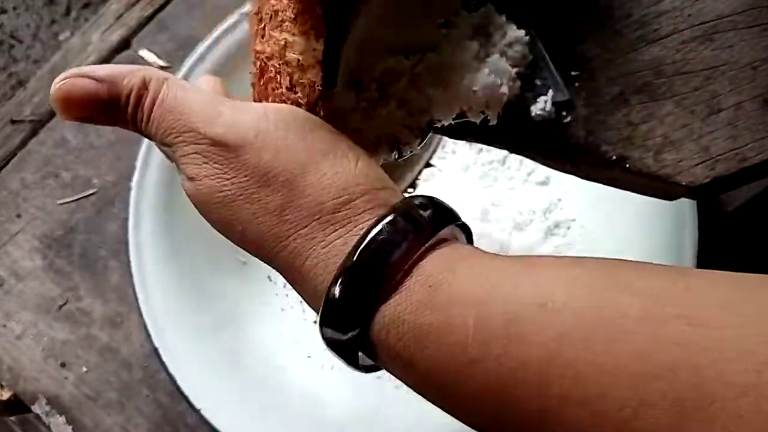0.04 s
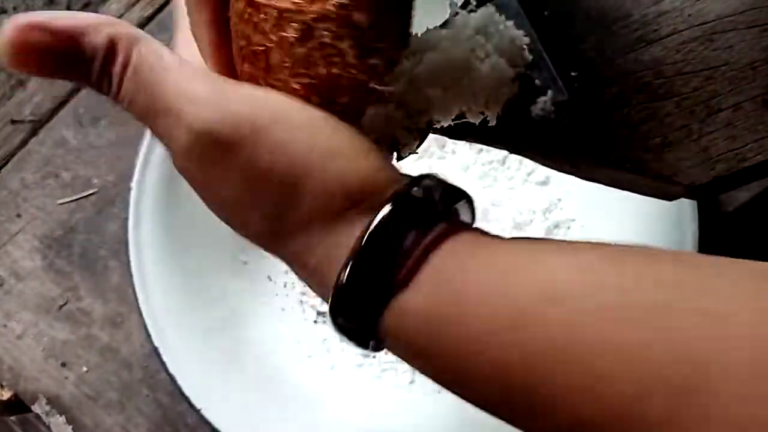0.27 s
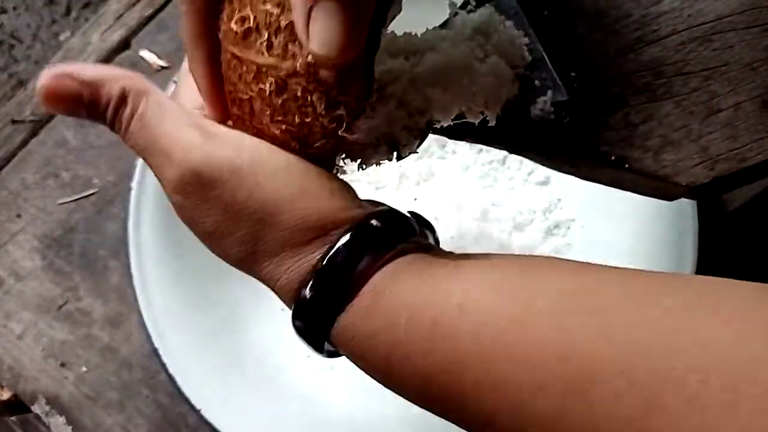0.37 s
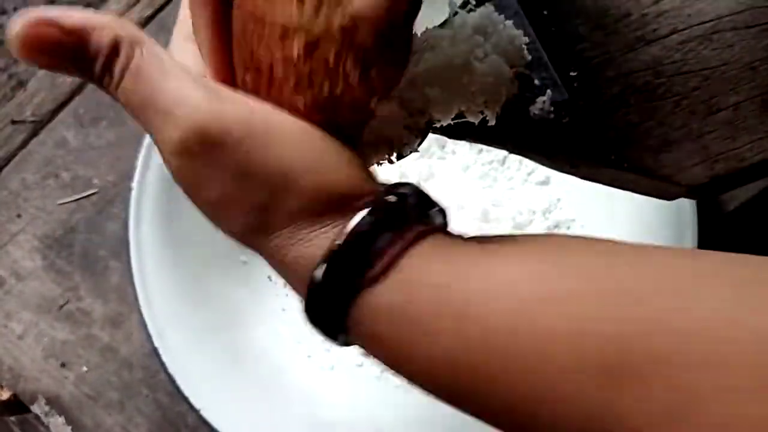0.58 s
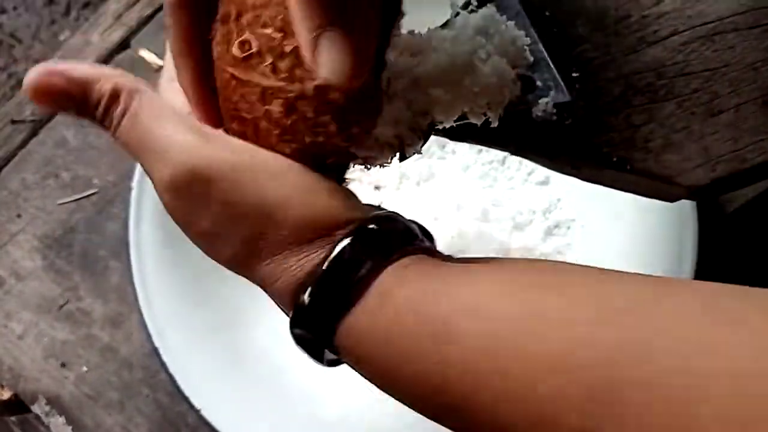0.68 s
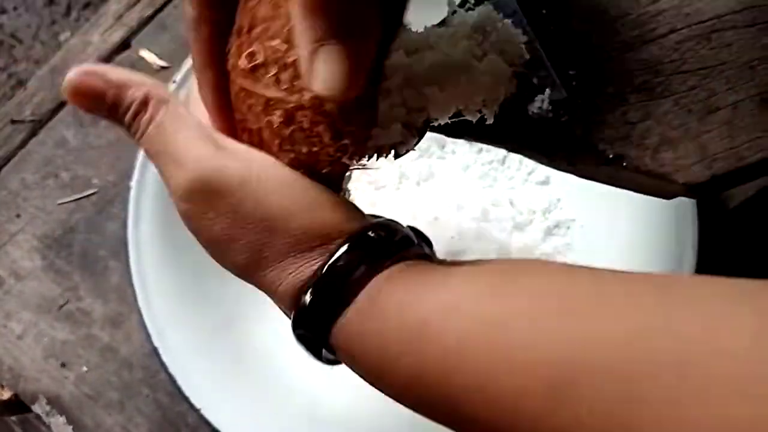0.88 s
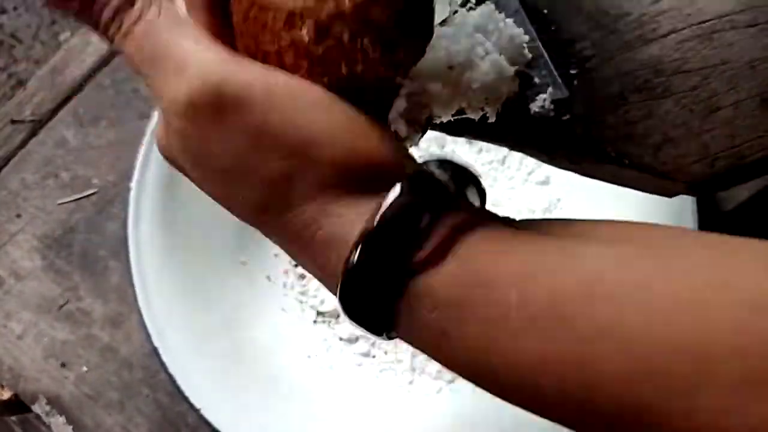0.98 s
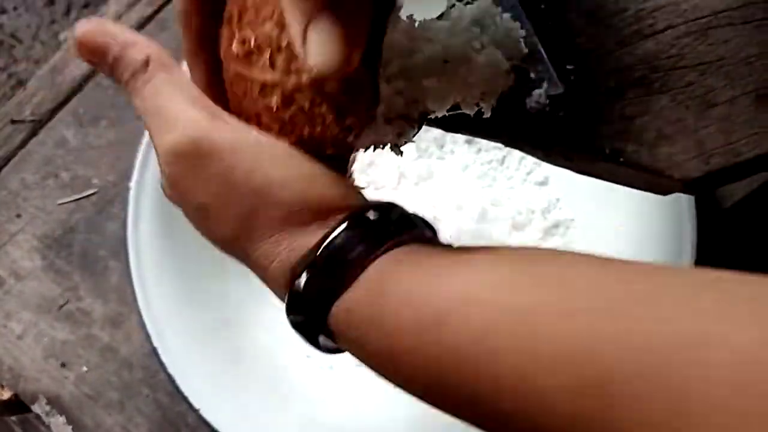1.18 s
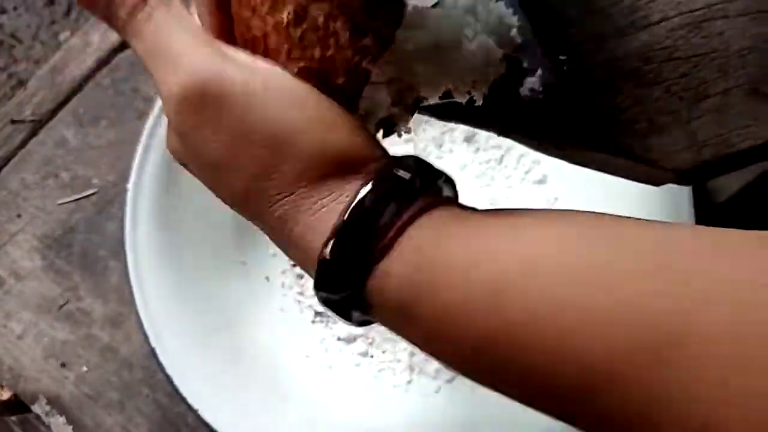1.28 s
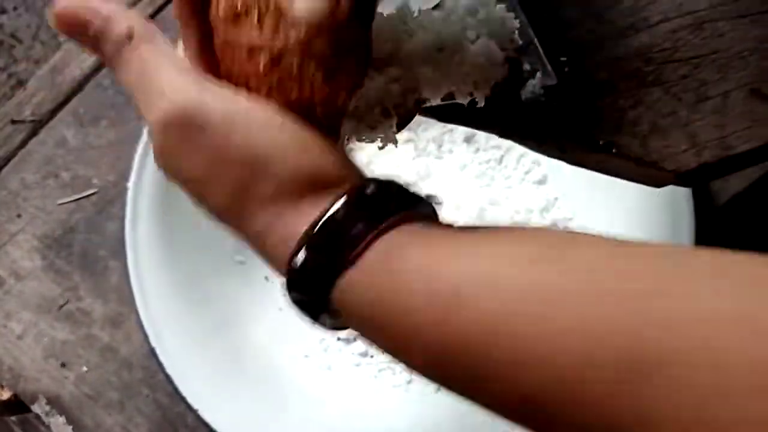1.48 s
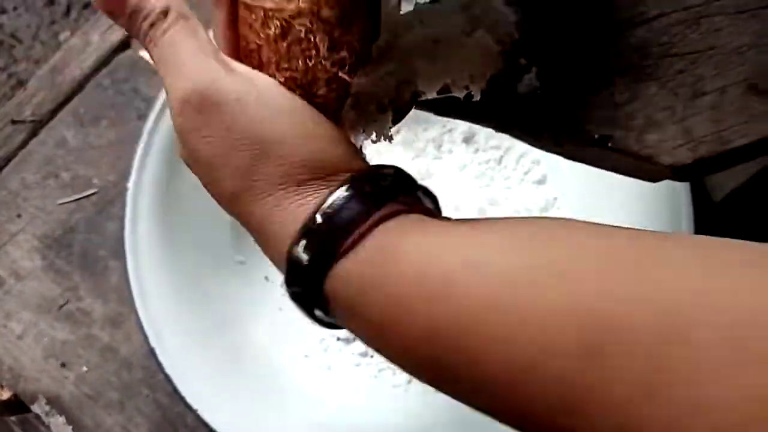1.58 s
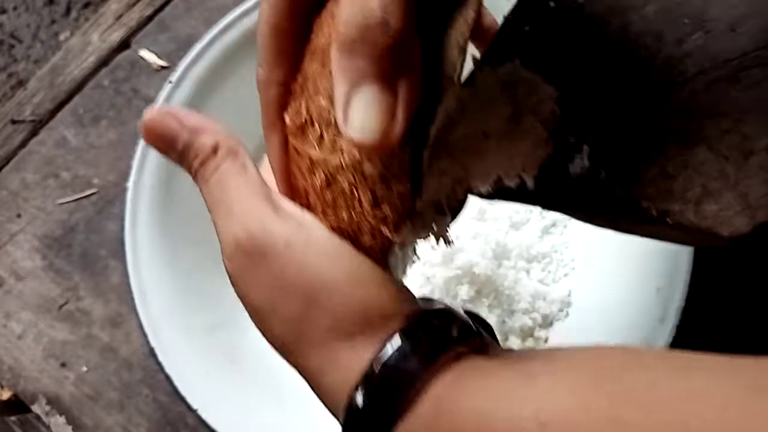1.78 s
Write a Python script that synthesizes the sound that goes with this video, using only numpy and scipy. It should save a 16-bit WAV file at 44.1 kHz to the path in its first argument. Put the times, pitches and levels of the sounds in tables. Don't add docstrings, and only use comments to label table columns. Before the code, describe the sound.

Coconut grating, close and dry in a quiet room. Faint scrapes and dull taps open, then six coarse, fibrous rasps begin near 0.2, 0.4, 0.7, 0.9, 1.2 and 1.5 seconds, each under a tenth of a second or slightly longer. Softer return drags fall between. Hollow shell and stool thuds colour the strokes; a loud knock lands at 1.2. Faint squeaks from 1.7 end it.

```python
import sys
import numpy as np
from scipy import signal
from scipy.fft import rfft, irfft
from scipy.io import wavfile
from scipy.ndimage import uniform_filter1d

SR = 44100
rng = np.random.default_rng(int(sys.argv[2]) if len(sys.argv) > 2 else 0)


def linear_from_db(decibels):
    return 10 ** (np.asarray(decibels, float) / 20)


def log_audio(samples):
    frames = np.atleast_2d(samples).T
    limited = np.clip(frames, -1, 1)
    pcm = np.round(limited * 32767).astype(np.int16)
    wavfile.write(sys.argv[1], SR, pcm)


N = 81585
T = np.arange(N) / SR

# f/Hz, density/dB
AIR_SPECTRUM = [(30, -4), (80, 12), (160, 8.5), (300, -7), (680, -14), (4100, -11), (9000, -10.5),
                (12000, -21)]
# f/Hz, t60/s
ROOM_T60 = [(100, 0.38), (400, 0.27), (1300, 0.27), (5000, 0.21), (12000, 0.089)]
# start/s, length/s, from/Hz, to/Hz, level/dB
CREAKS = [
    (1.111, .05, 940, 1210, -64),
    (1.39, 0.041, 1003, 1205, -67),
    (1.716, .016, 960, 1020, -65),
    (1.727, .022, 1030, 1255, -67),
    (1.742, .09, 1258, 1232, -65.5),
    (1.822, .023, 1220, 1180, -61),
]
# t/s, level/dB, f/Hz, t60/s
SHELL_KNOCKS = [(.041, -46, 300, .05), (.062, -47, 330, .05), (.078, -48, 260, .05), (.098, -49, 300, .05),
                (.113, -52, 240, .05), (.209, -34, 320, .04), (.649, -41, 260, .06), (.68, -34, 280, .04),
                (.931, -22.5, 300, .03), (1.199, -5.5, 345, 0.019), (1.205, -16, 300, .024),
                (1.212, -20, 290, .03), (1.479, -33, 290, .06), (1.63, -41, 200, .05),
                (1.714, -51, 190, .05), (1.829, -50, 300, 0.04)]
# t/s, level/dB, f/Hz
STOOL_JOLTS = [(0.219, -31.5, 360), (0.229, -28, 342), (0.254, -25, 392), (0.267, -27, 359),
               (0.277, -31, 340), (0.448, -34.5, 340), (0.464, -33.2, 312), (0.482, -36.7, 380),
               (0.494, -29.5, 334), (0.51, -35.5, 380), (0.519, -30, 308), (0.533, -30, 285),
               (0.701, -26.5, 312), (0.717, -26.5, 366), (0.738, -29.5, 408), (0.747, -20.5, 393),
               (0.757, -24.5, 410), (0.766, -27, 335), (0.93, -38.5, 322), (0.948, -31, 340),
               (0.961, -25, 293), (0.976, -37, 302), (0.995, -33.5, 348), (1.011, -25.5, 308),
               (1.023, -28.4, 365), (1.223, -27, 368), (1.245, -30, 440), (1.262, -25.5, 334),
               (1.289, -22.5, 305), (1.318, -32.5, 303), (1.498, -46, 343), (1.531, -36.6, 316),
               (1.545, -32, 368), (1.563, -26, 303)]
# t/s, level/dB, f/Hz
SHELL_PINGS = [(0.256, -30.5, 1235), (0.475, -30, 1287), (0.491, -29, 1313), (0.516, -31, 1270),
               (0.578, -39, 1282), (0.692, -29.5, 1025), (0.715, -38, 1260), (0.733, -36, 1310),
               (0.752, -44, 1210), (0.766, -40, 1178), (0.962, -40, 1257), (0.976, -45, 1226),
               (1.011, -47, 1260), (1.021, -46, 1190), (1.031, -33, 1096), (1.213, -35, 1214),
               (1.223, -34, 1270), (1.241, -44, 1150), (1.255, -52, 1281), (1.266, -43, 1179),
               (1.284, -45, 1170), (1.294, -33, 1210), (1.547, -35, 1250), (1.558, -38.5, 1055)]
# t/s, level/dB, f/Hz
BLADE_RINGS = [
    (1.325, -57.5, 2911),
]
# f/Hz, width/Hz, right level/dB, left level/dB, extra when dragged/dB
MODES = [(146.7, 20, 6, 6, 8.5), (192, 24, 5.5, 0.5, 14.5), (281, 49.4, 18.5, 19, 1.5),
         (399, 58.7, 15, 16.5, -2.5), (591, 65, 8, 2.5, -9), (950, 98, 1, 10, -4), (1306, 108, 7.5, 3.5, 8),
         (1723, 190, 3, 10, -4), (2116, 180, 4, 3.5, -25), (2582, 165, 7.5, 5.5, -19),
         (4594, 76, -2.5, -21, 15), (6334, 560, 5, 7.5, 3), (9030, 840, 6.5, -4.5, -2),
         (15060, 1730, 13.5, 5.5, 1)]
# f/Hz, level/dB
TEAR_SPECTRUM = [(40, -21), (100, -7), (600, 3), (2400, -3.5), (3300, -7.5), (5500, -3.5), (10000, -6.5),
                 (13500, -19.5)]
# f/Hz, level/dB
LEFT_TILT = [(60, -4), (400, -6), (1200, -11), (2000, -5.5), (3500, 0.8), (6500, -8), (9500, -8),
             (13000, -25.5)]
# f/Hz, correlation/1
PORT_LIKENESS = [(60, 0.97), (400, 0.95), (700, 0.83), (2000, 0.65), (4000, 0.32), (8000, 0.32)]
# middle/s, length/s, f/Hz, width/Hz
BAND_SHADES = [(0.2, 0.026, 3600, 200), (.25, .04, 4400, 120), (0.454, 0.065, 3330, 250),
               (0.706, .09, 3430, 200), (0.71, 0.028, 4450, 120), (.865, .04, 3320, 200),
               (0.955, 0.061, 3530, 130), (1.465, 0.073, 3900, 150)]
# start/s, length/s, level/dB, sag/dB, hollow ring/dB
LIGHT_DRAGS = [(0.023, 0.0094, -62.5, -4, -1), (0.034, 0.052, -53.5, -5, 9), (0.156, 0.0087, -43, 1, -18),
               (0.173, 0.026, -43.5, 0, -16), (0.318, 0.052, -44, -2, 2.5), (0.381, 0.023, -47, -6, -2),
               (0.57, 0.023, -41, -4.5, 6.5), (0.643, 0.025, -51, -7.5, -14), (0.83, 0.012, -49.5, -1, 9.5),
               (0.899, 0.015, -47, 2.5, -3), (1.093, 0.013, -49.5, -4.5, 7.5),
               (1.157, 0.019, -44, 1.5, -0.5), (1.361, 0.024, -50.5, -4.5, 5), (1.43, 0.021, -47, -1.5, 2),
               (1.616, 0.2, -66.5, -6.5, -20)]
# start/s, top/s, lift/s, top level/dB, bite below top/dB
PUSHES = [
    (0.202, 0.253, 0.28, -32, -4),
    (0.414, 0.499, 0.53, -30, -11),
    (0.671, 0.73, 0.78, -27, -14.5),
    (0.931, 0.992, 1.0383, -28, -10.5),
    (1.193, 1.246, 1.3117, -28, -13.5),
    (1.465, 1.563, 1.573, -32, -7.5),
]
PUSH_LEAN_DB = [-3.5, -4.5, -5, -5.5, -7, -6.5]
PUSH_LINGER_DB = [6, 6, 3, 3, 6, 13]
PUSH_SHARP_DB = [-0.5, 1.5, -2, 0.5, .5, -1]

FFT_SIZE, TAP_GRID, TAPS = 2 ** 17, 2 ** 14, 4096
AIR_DB, ROOM_DB = -78, -20.5
STOOL_HZ, STOOL_DB, STOOL_T60_S = 246, -4, 0.3
RUMBLE_HZ, RUMBLE_DB, RUMBLE_T60_S = 150, -8, 1
JOLT_DB, JOLT_RISE_S, JOLT_T60_S = 7, 0.0023, 0.035
OVERTONE_RATIO, OVERTONE_DB = 1.59, -7.5
PING_DB, PING_RISE_S, PING_T60_S = 2, 0.005, 0.048
BLADE_RISE_S, BLADE_T60_S = 0.005, 0.26
HOLLOW_MODE = 6
NOTCH_HZ, NOTCH_WIDTH_HZ, NOTCH_DEPTH = 3360, 78, 0.16
CLICKS_PER_S, CLICK_SPREAD_DB = 12000, 3
CHATTER_HZ, CHATTER_DB, BODY_CHATTER_DB, DRAG_CHATTER_DB = 164, 0.78, 2, 1.5
SCATTER_DB, SCATTER_S = -3, 0.0078
ROLL_DB, ROLL_BINS, ROLL_FRAMES, SHADE_DB = 2, 4, 16, -32
DRAG_RISE_S, DRAG_FALL_DB_PER_S = 0.0074, 1193
DRAG_SETTLE_DB, DRAG_SETTLE_DB_PER_S = -7.5, 275
BITE_S, LIFT_DROP_DB, LIFT_DB_PER_S = 0.009, -5, 731
BODY_HZ, BODY_POWER = 738, 0.93
BRIGHT_HZ, BRIGHT_POWER = 4850, 1.27
SETTLE_HZ, SETTLE_DB, SETTLE_DB_PER_S, SHREDS_DB = 1170, -26.5, 101, -21
PORT_LAG_SAMPLES = 34
GATE_FROM_HZ, GATE_DB, GATE_OTHER_DB = 2600, -7.5, -17.5
MIC_DB, MIC_LOW_HZ, EDGE_HZ = 6, 55, 15560


def evened(x):
    return x / np.sqrt(np.mean(x ** 2) + 1e-20)


def read(points, hz):
    f, value = np.transpose(points)
    return np.interp(np.log(hz + 1), np.log(f + 1), value)


def tint(x, gain):
    return irfft(rfft(x, FFT_SIZE) * gain(np.fft.rfftfreq(FFT_SIZE, 1 / SR)), FFT_SIZE)[..., :N]


def lowpass(edge_hz, order):
    return lambda hz: 1 / (1 + (hz / edge_hz) ** order)


def causal(gain):
    cepstrum = irfft(np.log(gain + 1e-5))
    half = len(cepstrum) // 2
    cepstrum[1:half] *= 2
    cepstrum[half + 1:] = 0
    return irfft(np.exp(rfft(cepstrum)))[:TAPS]


def chatter():
    return evened(tint(rng.standard_normal(N), lambda hz: (hz > 25) / (1 + (hz / CHATTER_HZ) ** 2)))


def air():
    noise = rng.standard_normal((2, N))
    return linear_from_db(AIR_DB) * evened(tint(noise, lambda hz: linear_from_db(read(AIR_SPECTRUM, hz)) * (hz > 20)))


def room(x):
    size = (2, SR // 2)
    taps = rng.choice([-1., 1.], size) * (rng.random(size) < .06) * (np.arange(SR // 2) > 300)
    hz, t, z = signal.stft(taps, SR, nperseg=256)
    decay = linear_from_db(-60 * t / read(ROOM_T60, hz)[:, None])
    tail = signal.istft(z * decay, SR, nperseg=256)[1]
    return linear_from_db(ROOM_DB) * signal.fftconvolve(x, tail / np.linalg.norm(tail[0]), axes=1)[:, :N]


def boom(x, cut_hz, db, t60_s):
    tail = rng.standard_normal(SR) * linear_from_db(-60 * T[:SR] / t60_s)
    tail = tail[None] / np.linalg.norm(tail)
    return linear_from_db(db) * signal.fftconvolve(tint(x, lowpass(cut_hz, 6)), tail, axes=1)[:, :N]


def scatter(x):
    t = np.arange(TAPS) / SR
    sparse = rng.random((2, TAPS)) < .05
    taps = rng.standard_normal((2, TAPS)) * sparse * linear_from_db(-60 * t / (2.3 * SCATTER_S))
    taps = np.diff(taps, prepend=0, axis=1) + 0.56 * taps
    taps = taps / np.linalg.norm(taps, axis=1, keepdims=True)
    return x + linear_from_db(SCATTER_DB) * signal.fftconvolve(x, taps, axes=1)[:, :N]


def rolled(x):
    hz, t, z = signal.stft(x, SR, nperseg=512, noverlap=384)
    field = rng.standard_normal((len(t), len(hz)))
    for _ in range(2):
        field = uniform_filter1d(field, ROLL_FRAMES, axis=0)
        field = uniform_filter1d(field, ROLL_BINS, axis=1)
    above_body = np.clip(hz / 1500, 0, 1)[:, None]
    z = z * linear_from_db(ROLL_DB * evened(field).T * above_body)
    for middle, length, f, width in BAND_SHADES:
        in_band = (2 * (hz[:, None] - f) / width) ** 4
        in_time = (2 * (t - middle) / length) ** 4
        z = z * linear_from_db(SHADE_DB * np.exp(-in_band - in_time))
    return signal.istft(z, SR, nperseg=512, noverlap=384)[1][:, :N]


def squeak():
    out, shake = np.zeros(N), linear_from_db(0.63 * chatter())
    waver_hz = 6 * evened(uniform_filter1d(rng.standard_normal(N), size=200))
    for start, length, from_hz, to_hz, db in CREAKS:
        u = np.clip((T - start) / length, 0, 1)
        swell = np.sin(np.pi * u ** .7) ** 1.2
        hz = from_hz + (to_hz - from_hz) * u + waver_hz
        out += linear_from_db(db) * swell * np.sin(2 * np.pi * np.cumsum(hz) / SR)
    return out * shake * linear_from_db([[-9], [0]])


def knocks():
    out = np.zeros(N)
    for start, db, hz, t60_s in SHELL_KNOCKS:
        t = np.maximum(T - start, 0)
        onset = 1 - np.exp(-(t / 0.0012) ** 2)
        bent_t = t + 0.0011 * (1 - np.exp(-t / 0.0011))
        out += linear_from_db(db - 60 * t / t60_s) * onset * np.sin(2 * np.pi * hz * bent_t)
    return out * linear_from_db([[-6.5], [0]])


def catches(rows, level_db, rise_s, t60_s, ratio=1):
    out = np.zeros(N)
    for start, db, hz in rows:
        t = np.maximum(T - start, 0)
        onset = 1 - np.exp(-(t / rise_s) ** 2)
        out += linear_from_db(level_db + db - 60 * t / t60_s) * onset * np.sin(2 * np.pi * ratio * hz * t)
    return out * linear_from_db([[-8], [0]])


def jolts():
    main = catches(STOOL_JOLTS, JOLT_DB, JOLT_RISE_S, JOLT_T60_S)
    return main + catches(STOOL_JOLTS, JOLT_DB + OVERTONE_DB, JOLT_RISE_S, JOLT_T60_S, OVERTONE_RATIO)


def pings():
    return catches(SHELL_PINGS, PING_DB, PING_RISE_S, PING_T60_S)


def blade_ring():
    return catches(BLADE_RINGS, 0, BLADE_RISE_S, BLADE_T60_S) * linear_from_db(2 * chatter())


def clicks(level):
    size_db = CLICK_SPREAD_DB * np.minimum(rng.exponential(1, (2, N)), 4.1)
    sign = rng.choice([-1, 1], (2, N))
    present = rng.random((2, N)) < CLICKS_PER_S / SR
    a, b = evened(linear_from_db(size_db) * sign * present) * level
    same = lambda hz: np.clip(read(PORT_LIKENESS, hz), 0, 1)
    left = tint(a, same) + tint(b, lambda hz: np.sqrt(1 - same(hz) ** 2))
    return np.array([left, a])


def body(side, dragged, hollow_only=False):
    hz = np.fft.rfftfreq(TAP_GRID, 1 / SR)
    power = np.ones(len(hz)) * (not hollow_only)
    for f, width, right_db, left_db, drag_db in [MODES[HOLLOW_MODE]] if hollow_only else MODES:
        mode_db = (left_db, right_db)[side] + dragged * drag_db
        power = power + linear_from_db(2 * mode_db) / (1 + (2 * (hz - f) / width) ** 2) ** 1.517
    shade = 1 - NOTCH_DEPTH / (1 + (2 * (hz - NOTCH_HZ) / NOTCH_WIDTH_HZ) ** 2)
    tilt_db = read(TEAR_SPECTRUM, hz) + (1 - side) * read(LEFT_TILT, hz)
    return causal(shade * np.sqrt(power) * linear_from_db(tilt_db))


def ring(drive, *how):
    return np.array([signal.oaconvolve(drive[side], body(side, *how))[:N] for side in range(2)])


def drags():
    level, hollow, settle = np.zeros((3, N))
    for start, length, db, sag_db, ring_db in LIGHT_DRAGS:
        after = np.maximum(T - start - length, 0)
        rise = np.clip((T - start) / DRAG_RISE_S, 0, 1) ** 2
        held = linear_from_db(db + sag_db * np.clip((T - start) / length, 0, 1)) * rise
        one = held * linear_from_db(-DRAG_FALL_DB_PER_S * after)
        level += one
        hollow += one * (linear_from_db(ring_db) - 1)
        takeover = np.minimum(after * DRAG_FALL_DB_PER_S / 10, 1)
        settle += held * linear_from_db(DRAG_SETTLE_DB - DRAG_SETTLE_DB_PER_S * after) * takeover
    drive = clicks(linear_from_db(DRAG_CHATTER_DB * chatter()))
    lows = tint(drive * settle, lowpass(BODY_HZ, 6))
    return ring(drive * level + lows, 1) + ring(drive * hollow, 0.97, True)


def pushes():
    db, weight, settle, sharp_db = np.full(N, -140.), np.zeros(N), np.zeros(N), np.zeros(N)
    for push, lean_db, linger_db, edge_db in zip(PUSHES, PUSH_LEAN_DB, PUSH_LINGER_DB, PUSH_SHARP_DB):
        start, top, lift, top_db, bite_db = push
        sharp_db = np.where(T > start, edge_db, sharp_db)
        to_top = np.clip((top - T) / (top - start), 0, 1)
        past_top = np.clip((T - top) / (lift - top), 0, 1)
        one = top_db + bite_db * to_top ** 1.37 + LIFT_DROP_DB * past_top ** 2
        one = one - LIFT_DB_PER_S * np.maximum(T - lift, 0)
        one = one + 20 * np.log10(np.clip((T - start) / BITE_S, 1e-6, 1))
        db = np.maximum(db, one)
        weight += linear_from_db(BODY_POWER * (one + 32.0) - 26.5 + lean_db)
        settle += (T > top) * linear_from_db(top_db + SETTLE_DB + linger_db - SETTLE_DB_PER_S * abs(T - lift))
    low, below_treble = lowpass(BODY_HZ, 6), lowpass(BRIGHT_HZ, 3)
    tear = clicks(linear_from_db(db + CHATTER_DB * chatter()))
    rock = clicks(linear_from_db(BODY_CHATTER_DB * chatter()))
    deep = tint(rock * weight, low)
    settling = tint(rock * settle, lambda hz: lowpass(SETTLE_HZ, 8)(hz) + linear_from_db(SHREDS_DB))
    middle = tint(tear, lambda hz: (1 - low(hz)) * below_treble(hz))
    bright_db = sharp_db + (BRIGHT_POWER - 1) * np.maximum(db + 26.5, -25)
    fizz = tint(tear * linear_from_db(bright_db), lambda hz: 1 - below_treble(hz))
    return ring(deep + settling + middle + fizz, 0)


def scene():
    near = scatter(rolled(pushes() + drags())) + knocks() + squeak()
    near = near + jolts() + pings() + blade_ring()
    near = np.array([np.roll(near[0], -PORT_LAG_SAMPLES), near[1]])
    floor = boom(near, STOOL_HZ, STOOL_DB, STOOL_T60_S) + boom(near, RUMBLE_HZ, RUMBLE_DB, RUMBLE_T60_S)
    return near + floor + room(near) + air()


def gate(x):
    hz, t, z = signal.stft(x, SR, nperseg=2048, noverlap=1536)
    power = uniform_filter1d(abs(z) ** 2, size=3, axis=2)
    wide = uniform_filter1d(power, size=90, axis=1)
    narrow = uniform_filter1d(power, size=7, axis=1)
    weak = narrow < linear_from_db(2 * GATE_DB) * (wide + linear_from_db(2 * GATE_OTHER_DB) * wide[::-1])
    z = z * ~(weak & (hz > GATE_FROM_HZ)[:, None])
    return signal.istft(z, SR, nperseg=2048, noverlap=1536)[1][:, :N]


def low_pass(x):
    return signal.sosfilt(signal.butter(12, 16390, fs=SR, output="sos"), x)


def record(dry):
    band = lambda hz: lowpass(EDGE_HZ, 300)(hz) * hz ** 3 / (hz ** 3 + MIC_LOW_HZ ** 3)
    mix = linear_from_db(MIC_DB) * tint(gate(dry), band)
    return low_pass(mix)


dry = scene()
out = record(dry)
log_audio(out)
```